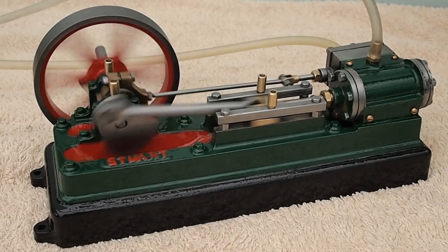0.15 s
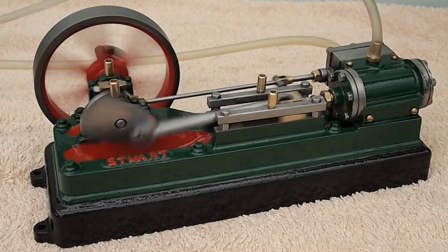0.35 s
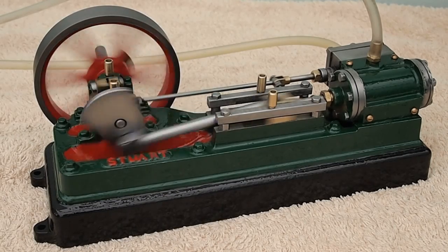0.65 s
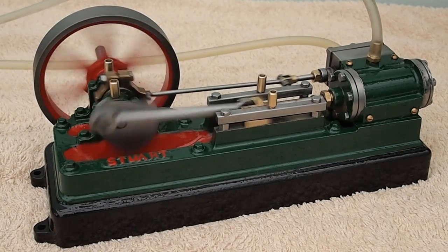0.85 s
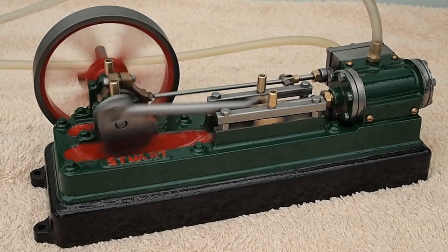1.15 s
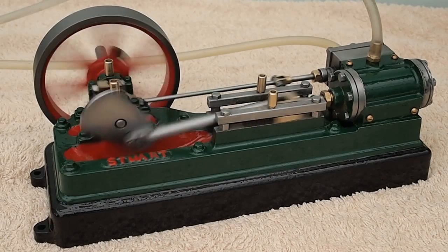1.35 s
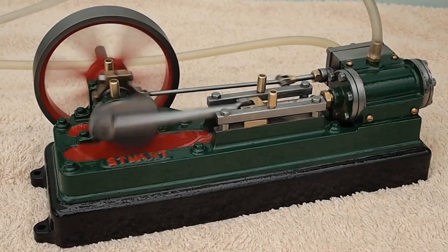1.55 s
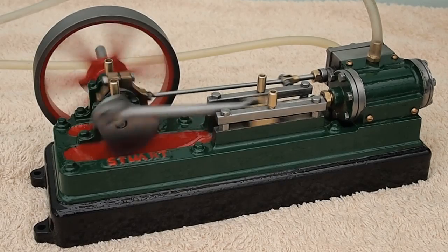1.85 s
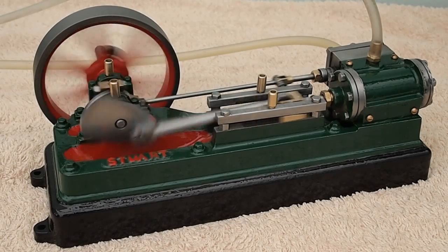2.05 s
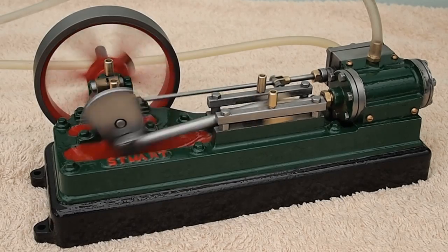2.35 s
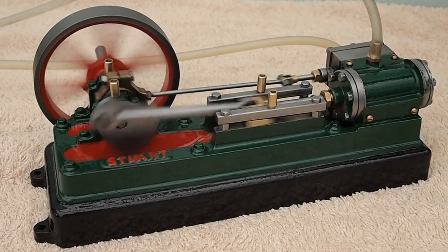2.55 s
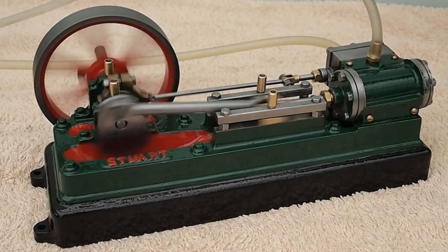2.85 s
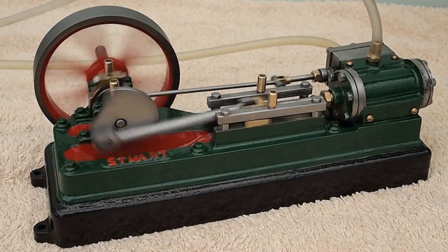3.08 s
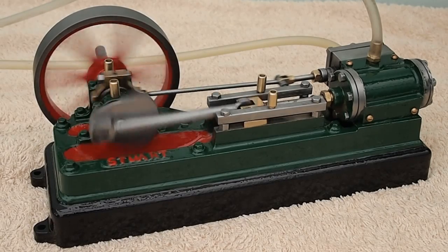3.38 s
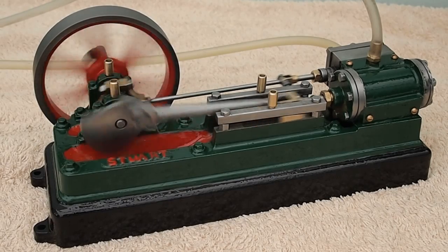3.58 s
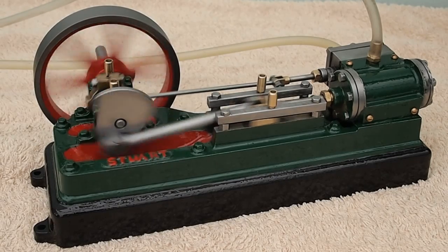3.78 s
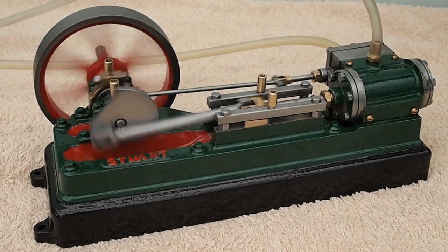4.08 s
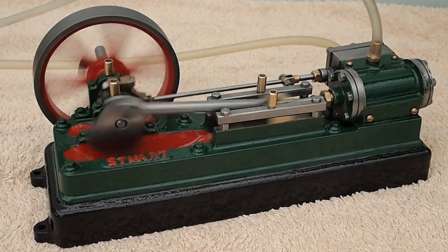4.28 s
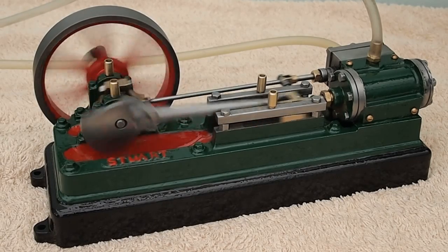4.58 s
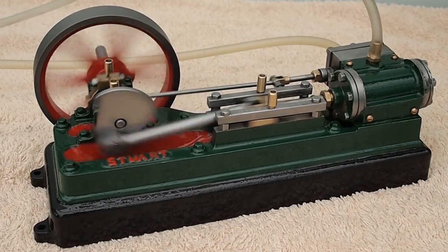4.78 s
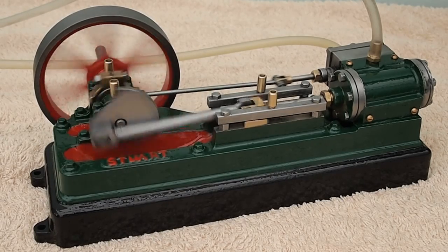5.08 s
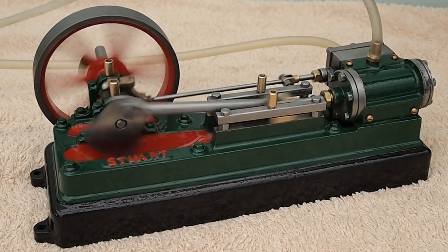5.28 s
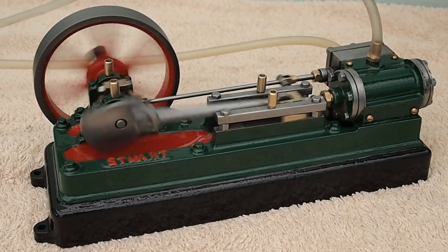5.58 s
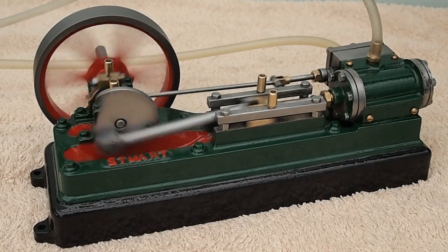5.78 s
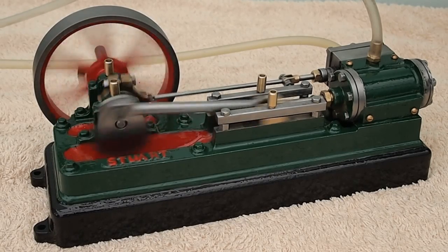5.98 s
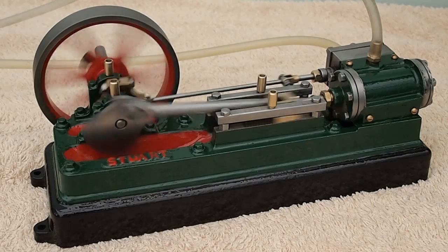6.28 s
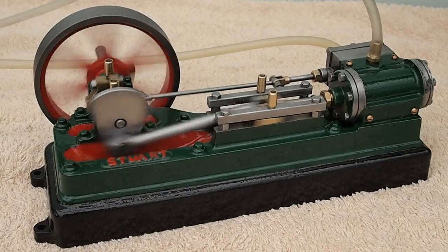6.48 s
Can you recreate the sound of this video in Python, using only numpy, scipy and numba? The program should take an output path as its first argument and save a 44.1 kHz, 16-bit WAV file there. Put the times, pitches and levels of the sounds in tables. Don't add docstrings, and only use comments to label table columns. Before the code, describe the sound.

A small air-driven model engine runs fast and steadily up close, ticking and knocking seven times a second with tiny squeaks over a constant hiss.

```python
import sys
import numpy as np
from scipy import signal
from scipy.fft import rfft, irfft, next_fast_len
from scipy.io import wavfile
from scipy.ndimage import uniform_filter1d, map_coordinates
from numba import njit

SR = 44100
rng = np.random.default_rng(int(sys.argv[2]) if len(sys.argv) > 2 else 0)


def level_to_linear(level):
    exponent = np.asarray(level, float) / 20
    return 10 ** exponent


def to_wav(sig):
    pcm = np.clip(np.atleast_2d(sig), -1, 1) * 32767
    pcm = np.round(pcm).astype(np.int16)
    wavfile.write(sys.argv[1], SR, pcm.T)


N = 292383

# t/s of a knock, turns done
CRANK_POSITION = [(.0258, 0), (.4535, 3), (.7378, 5), (1.305, 9), (1.728, 12), (2.0114, 14), (2.2939, 16),
                  (2.8573, 20), (3.282, 23), (3.5662, 25), (3.9938, 28), (4.4223, 31), (4.7067, 33),
                  (5.277, 37), (5.7031, 40), (6.1301, 43), (6.5568, 46)]
# t/s, level/dB
BEARING_PLAY = [(0, -2), (1, -3), (2.05, 0), (2.3, -0.5), (3.2, 3), (4.3, 0.1), (5.1, 2.3), (6.6, 1)]
PART_LEVELS = [
    -26,
    -8.5,
    -9.5,
    -14,
    -21,
]
# t/s, length/ms, first f/Hz, octave level/dB
HARD_CATCHES = [(.9447, 5.5, 6460, -16), (1.3712, 3, 6700, -15), (1.6502, 8.6, 6750, -16.5),
                (1.7907, 8.8, 6820, -19), (1.9358, 4.3, 6500, -14), (2.0765, 4.7, 6770, -16),
                (2.3591, 3.5, 6650, -13), (2.6385, 9.2, 6560, -18), (2.7772, 11, 5120, -12.5),
                (2.9185, 9.1, 5310, -10.5), (3.0578, 13.4, 5030, -12), (3.2027, 8, 6100, -11),
                (3.3448, 8.4, 6300, -12), (3.4869, 8, 5900, -12), (3.6282, 11.2, 5560, -10),
                (3.7722, 8.1, 6780, -12.5), (4.0579, 6.6, 6950, -11), (4.1976, 10.6, 5500, -12),
                (4.3405, 12, 6140, -13), (4.481, 17, 6060, -11.5), (4.6294, 5.8, 6140, -11.5),
                (4.769, 4.5, 6170, -9), (4.9134, 7, 6700, -11), (5.0533, 9.4, 5840, -9.5),
                (5.1959, 11.7, 6020, -11), (5.4837, 8.5, 6180, -13.5), (5.7666, 7.1, 6320, -11),
                (6.0523, 7.5, 6200, -16.5), (6.3369, 6.2, 6100, -15), (3.9144, 11, 6890, -28)]


def unit(x):
    return x / np.sqrt(np.mean(x ** 2) + 1e-20)


def filtered(x, response):
    m = next_fast_len(N + SR // 4)
    return irfft(rfft(x, m) * response(np.fft.rfftfreq(m, 1 / SR)), m)[:N]


def ringing(x, modes):
    def response(f):
        total = 0
        for k, (centre, width, db) in enumerate(modes):
            damping = 1j * f * width
            total = total + (-1) ** k * level_to_linear(db) * damping / (centre * centre - f * f + damping)
        return total
    return filtered(x, response)


def rush(colour, patchy_db):
    z = signal.stft(rng.standard_normal(N + 512), nperseg=512)[2]
    patches = uniform_filter1d(rng.standard_normal(z.shape), size=6, axis=0)
    patches = uniform_filter1d(patches, size=10, axis=1)
    noise = signal.istft(z * level_to_linear(patchy_db * unit(patches)), nperseg=512)[1][:N]
    hz, db = np.transpose(colour)
    return unit(filtered(noise, lambda f: level_to_linear(np.interp(np.log(f + 1), np.log(hz), db))))


def add(track, s, sound):
    track[round((s + 1) * SR):][:len(sound)] += sound


def knocks():
    s, done = np.transpose(CRANK_POSITION)
    s = np.interp(np.arange(done[-1] + 1), done, s)
    catch_turns = np.searchsorted(s, [row[0] for row in HARD_CATCHES]) - 1
    return s, np.isin(np.arange(len(s)), catch_turns)


def turns(after_catch_db=-3.5):
    scatter = [
        0.17,
        1.1,
        0.33,
        0.53,
        1.1,
    ]
    s, caught = knocks()
    play_db = np.interp(s, *np.transpose(BEARING_PLAY))
    db = PART_LEVELS + scatter * rng.standard_normal((len(s), len(PART_LEVELS)))
    thud, tick, knock, ring, tap = db.T
    tap = tap + play_db + after_catch_db * caught
    return np.transpose([s, thud, tick, knock + play_db, ring, tap])


def low_ringing(scatter_db=0.94):
    # f/Hz, t60/s, signed share/%
    low_modes = [(145, .135, 6.6), (186, .021, -17.5), (206, .08, -1.1), (222, .025, 6),
                 (297.5, .24, -2.15), (375, .12, -.26), (485, .029, .36), (598, .072, .28),
                 (706, .029, -1.43), (710, .032, 1.54), (790, .05, .1), (933, .02, -.06)]
    # t/ms from the knock, signed strength, hardness (power of frequency)
    pushes = [(-17.63, .6, 3.5), (-17.15, .12, -2.35), (-11.96, 1, .53), (-1.14, 2.25, 3.11),
              (3.12, .09, -3.5), (10.66, .6, 3.3), (42.8, .04, -3.5), (63.46, .03, -3.5), (65, .2, 3.5),
              (76, .2, 3.5), (78.28, -.35, .68)]
    track, t = np.zeros(N + 2 * SR), np.arange(SR // 3)[:, None] / SR
    hz, t60, share = np.transpose(low_modes)
    modes = share / 100 * np.sin(2 * np.pi * hz * t) * level_to_linear(-60 * t / t60)
    rings = [strength * modes @ (hz / 300) ** hardness for _, strength, hardness in pushes]
    before = [(CRANK_POSITION[0][0] - 1 / 7.03, PART_LEVELS[0])]
    for s, db, *_ in before + list(turns()):
        play_db = np.interp(s, *np.transpose(BEARING_PLAY))
        for (ms, _, hardness), ring in zip(pushes, rings):
            push_db = db + 26.5 + 0.065 * hardness * play_db + scatter_db * rng.standard_normal()
            add(track, s + ms / 1000, level_to_linear(push_db) * ring)
    return track[SR:SR + N]


def contacts(hits, modes, order, trim_db, strike=4.5):
    track, ms = np.zeros(N + 2 * SR), np.arange(SR // 25) * 1000 / SR
    for turn in turns():
        for at_ms, db, t60_ms in hits:
            late_ms, loud_db = rng.standard_normal(2) * [.2, 1.1]
            fade = level_to_linear(-60 * ms / t60_ms)
            rattle = fade * rng.standard_normal(len(ms))
            rattle[0] = strike
            rattle *= np.linalg.norm(fade) / np.linalg.norm(rattle)
            add(track, turn[0] + (at_ms + late_ms) / 1000, level_to_linear(turn[order] + db + loud_db) * rattle)
    return level_to_linear(trim_db) * ringing(track[SR:SR + N], modes)


def crosshead_knock():
    # t/ms from the knock, level/dB, t60/ms
    knock_hits = [(-1.4, 0, 8), (-.5, 1, 8), (.6, -2, 6), (1.6, -3, 8), (2.5, -8, 50), (5.2, -10, 15),
                  (11, -10, 50)]
    # f/Hz, width/Hz, level/dB
    knock_modes = [(1097, 170, -9), (2310, 184, 0), (2627, 60, 2), (3235, 410, 0), (4805, 194, 4.5),
                   (5890, 230, 5)]
    return contacts(knock_hits, knock_modes, order=3, trim_db=7)


def valve_tick():
    # t/ms from the knock, level/dB, t60/ms
    tick_hits = [(-24, -15, 8), (-18.2, -1, 6), (-16.6, 0, 8), (-14.6, -9, 25)]
    # f/Hz, width/Hz, level/dB
    tick_modes = [(3340, 1080, -1.7), (4760, 660, 3.5), (6370, 1380, 4.5), (7860, 470, 6),
                  (10980, 620, 1.5), (12800, 770, -19)]
    return contacts(tick_hits, tick_modes, order=2, trim_db=6.5)


def guide_ring():
    # t/ms from the knock, level/dB, t60/ms
    ring_hits = [(-.8, -12, 10), (4.6, 0, 14), (7.8, -7, 12), (11.8, -6, 12)]
    # f/Hz, width/Hz, level/dB
    ring_modes = [(6500, 3200, 5.2), (10490, 630, 14.74), (11900, 760, 6.9)]
    return contacts(ring_hits, ring_modes, order=4, trim_db=3)


def return_tap():
    # t/ms from the knock, level/dB, t60/ms
    tap_hits = [(74.5, 0, 12), (77, -2, 14), (80, -6, 30)]
    # f/Hz, width/Hz, level/dB
    tap_modes = [(2740, 680, -0.5), (3660, 820, -7), (4600, 830, -0.5), (6400, 750, 5), (11200, 810, 2)]
    return contacts(tap_hits, tap_modes, order=5, trim_db=14.5)


def linkage():
    # t/ms from the knock, level/dB, t60/ms
    link_hits = [(-25, -7, 14), (-15.5, -5, 14), (10.6, 0, 12), (14, -5, 25), (38, -9, 14), (76.8, 0, 14)]
    # f/Hz, width/Hz, level/dB
    link_modes = [(1270, 550, -5.75), (1770, 300, -0.5), (2630, 750, 1)]
    return contacts(link_hits, link_modes, order=1, trim_db=18)


def squeaks():
    # t/s, squeak level/dB
    grip = [(.09, -14.5), (.23, -27), (.85, -31), (1.08, -8.5), (1.3, -27), (1.5, -18), (2.5, -25),
            (3.9, -15), (5.65, -13), (5.9, -19.5), (6.5, -16)]
    s, caught = knocks()
    s, caught = s[:-1], caught[:-1]
    a, b, c, d = rng.standard_normal((len(s), 4)).T
    ms = np.clip(6.4 + 0.97 * a, 3, 15)
    start = s + (68.3 - 0.25 * ms) / 1000
    db = np.interp(s, *np.transpose(grip))
    rows = np.transpose([start, ms, 6550 + 200 * b, db - 8 + 2.5 * d])
    rows[caught] = sorted(HARD_CATCHES)
    s, ms, first_hz, octave_db = rows.T
    db = np.where(caught, -8 - 0.5744 * ms, db)
    return np.transpose([s, ms, first_hz, 6250 + 110 * c, db, octave_db])


def gland(wander=.018, flutter_db=2.6, rise_ms=0.23, end_ms=.5, catch_ms=3.3, scrape_db=-2.5):
    # f/Hz, width/Hz, level/dB
    gland_modes = [(6650, 6000, -1), (10400, 680, 5.5), (12140, 1900, -1.5)]
    track = np.zeros(N + 2 * SR)
    for s, length_ms, first_hz, last_hz, db, octave_db in squeaks():
        ms = np.arange(round(length_ms * SR / 1000)) * 1000 / SR
        u = ms / length_ms
        slow = lambda: map_coordinates(rng.standard_normal(24), [ms / 1.16])
        glide = np.clip(1.89 * u - .45, -.25, 1)
        hz = (first_hz + (last_hz - first_hz) * glide) * (1 + wander * slow())
        phase = 2 * np.pi * np.cumsum(hz) / SR
        edges = np.clip(np.minimum(ms / rise_ms, (length_ms - ms) / end_ms), 0, 1)
        catch = 1 - .96 * np.exp(-((length_ms - ms - catch_ms) / .5) ** 2)
        low = level_to_linear(db + 1 + 8 * u + flutter_db * slow()) * catch * np.sin(phase)
        high = level_to_linear(octave_db + 4.0 - 94 * (u - .3) ** 2 + flutter_db * slow()) * np.sin(2 * phase)
        add(track, s, edges * (low + high))
        after_ms = np.arange(SR // 40) * 1000 / SR
        fade = 2.3 * level_to_linear(-60 * after_ms / 7) + 0.51 * level_to_linear(-60 * after_ms / 70)
        scrape = np.diff(rng.standard_normal(len(fade) + 1))
        add(track, s, level_to_linear(octave_db + scrape_db) * fade * scrape)
    return ringing(track[SR:SR + N], gland_modes)


def rocking(hz=86):
    # t/ms from the knock, level/dB, swell/ms
    sways = [(-16.5, -9.5, 11.7), (53, -18, 9.9), (80, -23, 15.5)]
    track, ms = np.zeros(N + 2 * SR), np.arange(SR // 6) * 1000 / SR
    for s, db, *_ in turns():
        for at_ms, rock_db, swell_ms in sways:
            swell = ms / swell_ms * np.exp(1 - ms / swell_ms)
            sway = swell * np.sin(2 * np.pi * hz * ms / 1000)
            add(track, s + at_ms / 1000, level_to_linear(db + rock_db + 10.5) * sway)
    return track[SR:SR + N]


def leak(swell_db=0.9, peak_turn=0.14):
    # t/s, level/dB
    drift = [(0.0, -19), (6.63, -18)]
    # f/Hz, level/dB
    hiss_colour = [(500, -13.5), (1100, -16.5), (2000, -11), (3000, -10.5), (4150, -6), (4900, -10),
                   (5800, -3), (7000, -2), (8300, -8), (10500, -9.5), (12500, -8.5), (13700, -11.5),
                   (15500, -12.5)]
    t = np.arange(N) / SR
    turn = np.interp(t, *np.transpose(CRANK_POSITION))
    level_db = np.interp(t, *np.transpose(drift)) + swell_db * np.cos(2 * np.pi * (turn - peak_turn))
    return level_to_linear(level_db) * rush(hiss_colour, patchy_db=1.14)


def room_noise():
    # f/Hz, level/dB
    room_colour = [(20, -20), (38, 17), (49, 14), (62, -18), (110, 4), (250, 5), (500, -22), (900, -22),
                   (1600, -23)]
    return level_to_linear(-39.5) * rush(room_colour, patchy_db=-1.0)


def scene():
    clatter = crosshead_knock() + valve_tick() + guide_ring() + return_tap() + linkage()
    engine = level_to_linear(3.0) * low_ringing() + clatter + gland() + rocking() + leak()
    return (engine + room_noise())[None]


@njit
def duck(over_db, fall, rise_db):
    gain, g = np.zeros(len(over_db)), 0.
    for i in range(len(over_db)):
        if -over_db[i] < g:
            g = g + fall * (-over_db[i] - g)
        else:
            g = min(g + rise_db, 0.)
        gain[i] = g
    return gain


def band_limit(x):
    return signal.sosfilt(signal.butter(12, 16640, fs=SR, output="sos"), x)


def record(dry, limit_db=-16, fall_ms=4, rise_db=30, late_ms=7.7, notch_hz=7865, bass_hz=45):
    level_db = 10 * np.log10(np.abs(uniform_filter1d(dry[0] ** 2, size=132)) + 1e-12)
    gain_db = duck(level_db - limit_db, 1000 / (fall_ms * SR), rise_db / SR)
    late_gain_db = np.interp(np.arange(N) - late_ms * SR / 1000, np.arange(N), gain_db)
    x = np.clip(dry[0] * level_to_linear(late_gain_db), -1, 1)
    notch = lambda f, c: (c * c - f * f + 1j * f * 25) / (c * c - f * f + 1j * f * 230)
    edge = lambda f: level_to_linear(np.interp(f, [15730, 15770, 15850, 15900, 16300], [0, -9, -16, -45, -65]))
    bass = lambda f: (1j * f / (bass_hz + 1j * f)) ** 2
    x = filtered(x, lambda f: notch(f, notch_hz - 30) * notch(f, notch_hz + 30) * edge(f) * bass(f))
    return band_limit(x[None])


dry = scene()
out = record(dry)
to_wav(out)
```